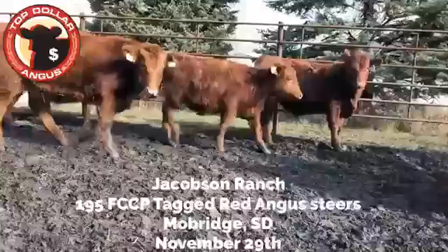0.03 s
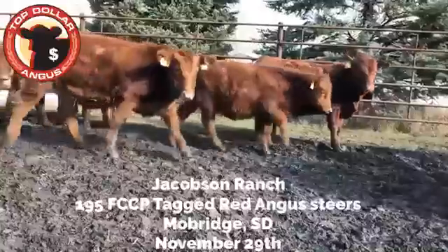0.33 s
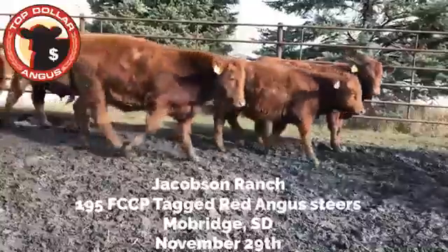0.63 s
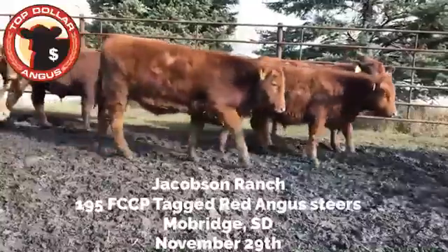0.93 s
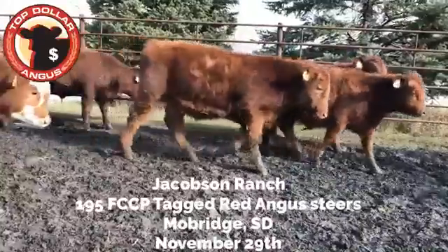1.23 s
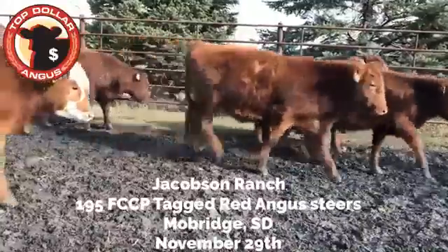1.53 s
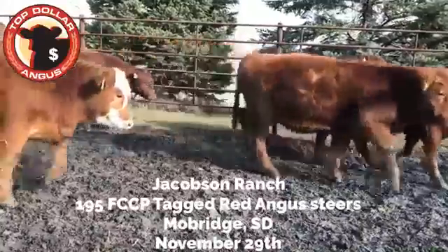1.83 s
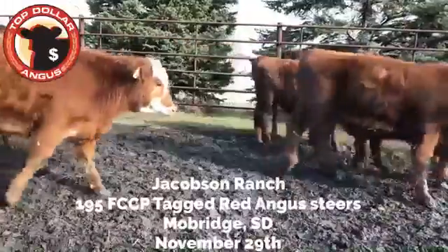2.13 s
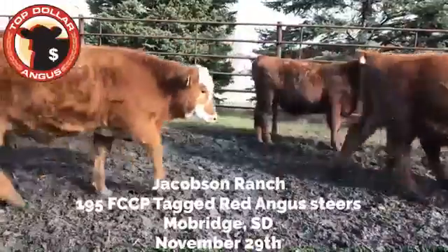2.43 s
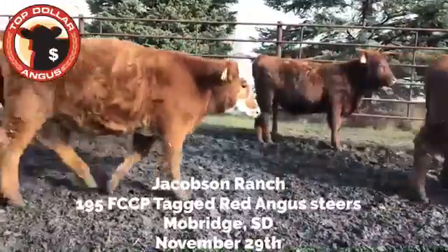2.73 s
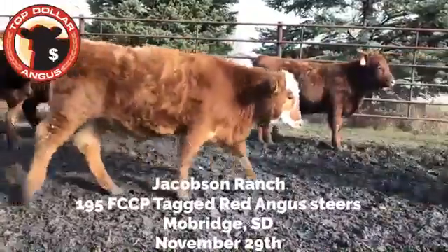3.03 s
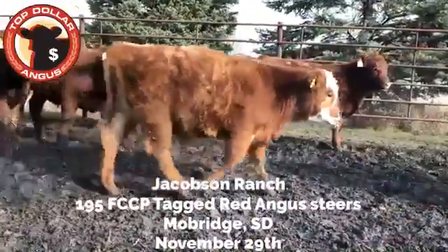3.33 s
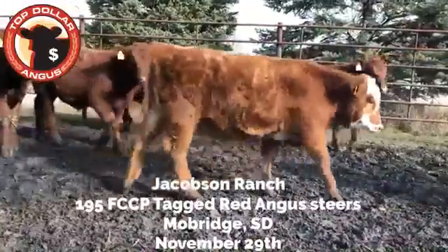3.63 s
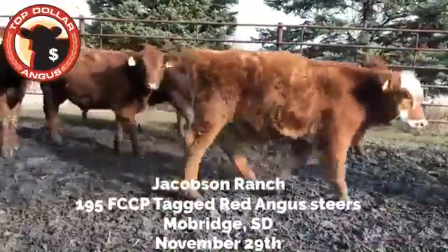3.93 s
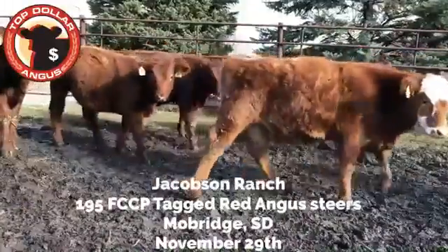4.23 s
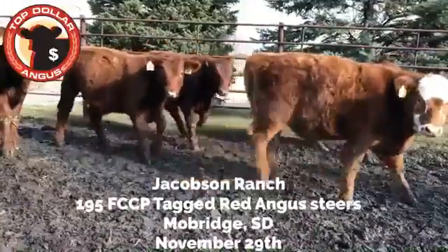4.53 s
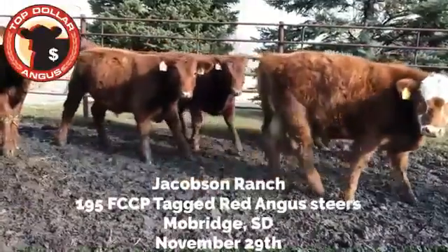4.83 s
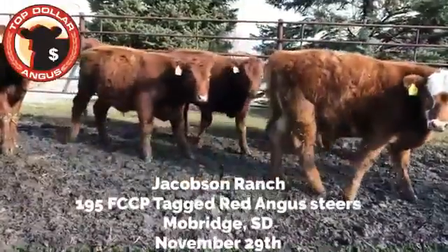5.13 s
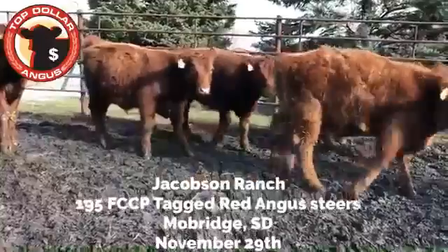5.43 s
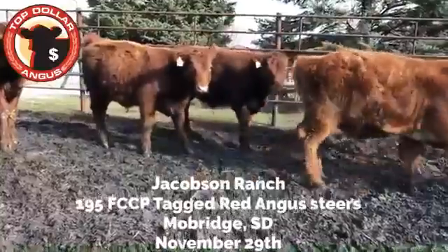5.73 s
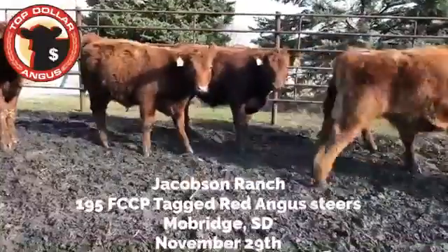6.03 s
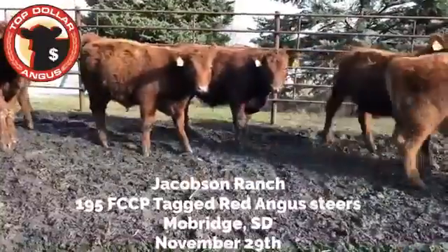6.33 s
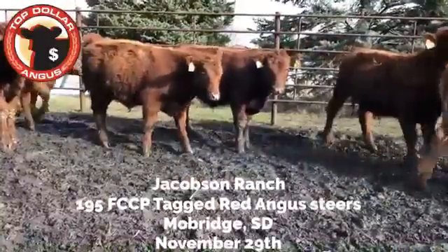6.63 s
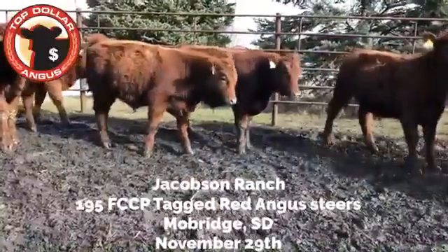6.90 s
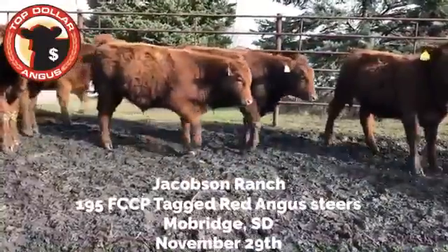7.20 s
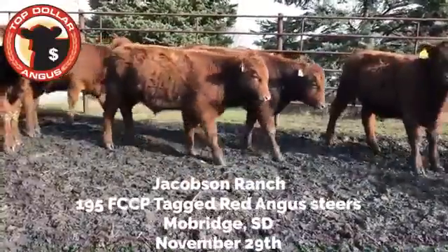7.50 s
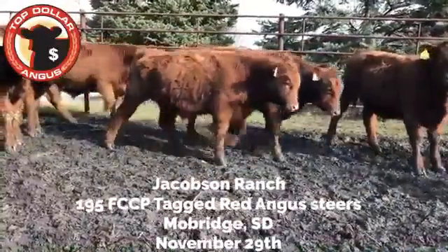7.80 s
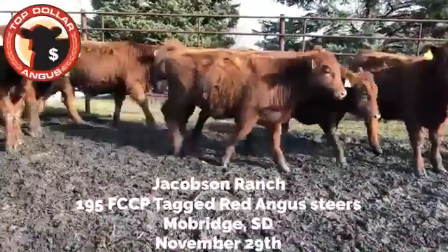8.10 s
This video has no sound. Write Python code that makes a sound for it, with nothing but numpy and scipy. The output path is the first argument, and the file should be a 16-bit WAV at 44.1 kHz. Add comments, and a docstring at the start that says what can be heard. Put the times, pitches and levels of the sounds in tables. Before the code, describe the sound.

Cattle step through crumbly mud outdoors as gusty wind starts thumping the microphone; a small bird chirps faintly and a far steer lows.

```python
"""Steers walk through a pen of half-dried mud: from the start, crumbs rustle, clods crunch under
their hooves and wet pockets pop. Just after two seconds a small bird gives the first of four arched chirps.
From three seconds on, the wind picks up and buffets the microphone in eddies that each fall in pitch.
Around five seconds a far steer lows softly; the bird chirps on, and hooves and wind last to the end."""
import sys
import numpy as np
from scipy import signal
from scipy.fft import rfft, irfft, next_fast_len
from scipy.io import wavfile
from scipy.ndimage import map_coordinates

SR = 44100
rng = np.random.default_rng(int(sys.argv[2]) if len(sys.argv) > 2 else 0)


def store_pcm(level_fs):
    """Save levels as 16-bit WAV."""
    pcm = np.round(np.clip(level_fs, -1, 1) * 32767).astype(np.int16)
    wavfile.write(sys.argv[1], SR, np.atleast_2d(pcm).T)


N = 359856


def amp(db):
    """Decibels to gain."""
    return 10 ** (np.asarray(db) / 20)


def unit(x):
    """Scale to rms 1."""
    return x / np.sqrt(np.mean(x ** 2) + 1e-20)


def curves(rows):
    """Automation lanes: one value per sample for each column after the time."""
    times, *columns = np.transpose(rows)
    return [np.interp(np.arange(N) / SR, times, column) for column in columns]


def hold(s, length, attack, release):
    """An envelope that rises to 1 at time s, holds and dies away; its edges are time constants."""
    t = np.arange(N) / SR
    return np.exp(np.minimum(t - s, 0) / attack - np.maximum(t - s - length, 0) / release)


def wobble(rate):
    """A smooth random curve, rate knots a second."""
    knots = rng.standard_normal(int(N * rate / SR) + 4)
    return map_coordinates(knots, [np.arange(N) * rate / SR])


def filtered(x, response):
    """Shape x with a gain that depends on frequency."""
    size = next_fast_len(len(x) + 8192)
    return irfft(rfft(x, size) * response(np.fft.rfftfreq(size, 1 / SR)), size)[:len(x)]


def coloured(x, points):
    """x through an EQ curve, at rms 1."""
    bands, db = np.transpose(points)
    return unit(filtered(x, lambda hz: amp(np.interp(np.log(hz + 1), np.log(bands), db))))


def add(track, s, sound):
    """Mix a sound into a track at time s."""
    start = max(0, round(s * SR))
    part = track[start:start + len(sound)]
    part += sound[:len(part)]


def grains(size, rate, spread_db):
    """Random tiny fractures: sparse impulses, a few much larger than the rest."""
    sizes = amp(spread_db * np.minimum(rng.standard_normal(size), 2.5))
    return (rng.random(size) < rate / SR) * sizes * rng.standard_normal(size)


def voice(hz, waver, rate):
    """Phase of a slightly unsteady voice that follows a pitch."""
    return 2 * np.pi * np.cumsum(hz * (1 + waver * wobble(rate))) / SR


# EQ of the yard's ambience (frequency [Hz], gain [dB])
AIR_EQ = [(30, -14), (130, 13), (300, -2), (700, -7.5), (1500, -13), (4000, -48.5), (8000, -48),
          (15000, -43)]
def yard_air(level_db=-60):
    """The quiet air of the yard: a steady, dark noise bed."""
    return amp(level_db) * coloured(rng.standard_normal(N), AIR_EQ)


# contour of the far steer's call (time [s], pitch [Hz], relative level [dB])
LOW_CONTOUR = [(4.72, 253.4, -70), (4.78, 258.5, -32), (4.88, 271, -32), (4.97, 260.5, -31.5),
               (5.06, 273.6, -37), (5.17, 286.3, -31), (5.32, 268.2, -28.5), (5.42, 247, -54)]
def lowing(level_db=2, overtone_db=-29):
    """A closed-mouth low: almost a pure tone."""
    t, (hz, db) = np.arange(N) / SR, curves(LOW_CONTOUR)
    phase = voice(hz, waver=0.0037, rate=40)
    gain = amp(db + level_db) * (t > LOW_CONTOUR[0][0]) * (t < LOW_CONTOUR[-1][0])
    return gain * (np.sin(phase) + amp(overtone_db) * np.sin(2 * phase))


# bird calls, each an arch in pitch (time of top [s], top pitch [Hz], rise [s], fall [s], level [dB])
CHIRPS = [(2.205, 4620, 0.036, 0.066, -55), (4.802, 4700, 0.033, 0.054, -50.5),
          (5.946, 4110, 0.083, 0.049, -51), (6.256, 4450, 0.046, 0.057, -45)]
def bird(drop=0.36, rasp_db=4, bounce_db=-6, bounce_s=0.012, echo_db=-8, echo_t60=0.2, fade_s=0.003):
    """Arched, slightly raspy whistles, doubled by the fence and scattered by the trees."""
    out, t = np.zeros(N), np.arange(N) / SR
    for s, top_hz, rise, fall, db in CHIRPS:
        flank = np.minimum(np.maximum((s - t) / rise, (t - s) / fall), 1)
        arch = 1 - drop * flank ** 1.4  # power 1 = pointed top, 2 = round
        gain = amp(db) * np.clip(np.minimum(t - s + rise, s + fall - t) / fade_s, 0, 1)
        out += gain * np.sin(voice(top_hz * arch, waver=0.0213, rate=540))
    out *= amp(rasp_db * wobble(150))
    tail = rng.standard_normal(SR // 3) * amp(-60 * np.arange(SR // 3) / SR / echo_t60)
    scattered = signal.fftconvolve(out, tail / np.linalg.norm(tail))[:N]
    return out + amp(bounce_db) * np.roll(out, int(bounce_s * SR)) + amp(echo_db) * scattered


# gusts riding on the breeze (time [s], length [s], relative push [dB], relative flutter [dB])
GUSTS = [(0.174, 0.041, -42.5, -44.5), (1.466, 0.067, -43, -47), (1.587, 0.048, -33, -36),
         (1.701, 0.034, -37, -47), (2.251, 0.064, -44.5, -59), (2.631, 0.052, -43.5, -53),
         (2.922, 0.019, -26, -40), (3.05, .04, -42, -30), (3.097, 0.077, -25.5, -34),
         (3.154, 0.125, -28.5, -29), (3.476, 0.089, -20.5, -29.5), (3.679, 0.037, -25, -36),
         (3.873, 0.037, -22, -37.5), (4.146, 0.038, -21, -25), (4.222, 0.045, -25.5, -28),
         (4.321, 0.043, -25.5, -30.5), (4.407, 0.057, -21, -28.5), (4.539, 0.095, -25, -31.5),
         (4.697, 0.031, -20, -26), (5.002, .06, -23, -31), (5.091, 0.097, -21.5, -32),
         (5.215, 0.064, -17, -26), (5.312, 0.053, -24, -31), (5.407, 0.094, -20, -26.5),
         (5.633, .059, -21, -23), (5.726, 0.05, -16.5, -21.5), (5.802, 0.17, -24.5, -28),
         (6.189, 0.022, -27, -34), (6.398, .068, -27.5, -30), (6.505, 0.04, -23, -28),
         (6.674, 0.084, -24, -33), (6.998, 0.063, -21, -30), (7.209, 0.013, -23.5, -37),
         (7.403, 0.063, -20, -24), (7.76, 0.014, -20, -30.5), (7.829, 0.047, -19, -30.5),
         (8.044, 0.065, -20, -30)]
def gusts(attack_s=0.0077, release_s=0.011, level_db=0.5):
    """Two envelopes for the gusts: their low push and their flutter."""
    out = np.zeros((2, N))
    for s, length, push_db, flutter_db in GUSTS:
        out = np.maximum(out, amp([[push_db], [flutter_db]]) * hold(s, length, attack_s, release_s))
    return amp(level_db) * out


# the breeze's push on the microphone between gusts (time [s], level [dB])
BREEZE = [(0.0, -53.5), (0.7, -59.5), (1.05, -54.5), (1.25, -45.5), (1.65, -40.5), (1.82, -49),
          (2.55, -51.5), (3.0, -35.5), (3.35, -29), (3.8, -43), (4.07, -35.5), (4.3, -25), (4.82, -28.5),
          (5.3, -33.5), (5.85, -20.5), (6.15, -30.5), (7.5, -28.5), (8.16, -34.5)]
# EQ of the wind's low end (frequency [Hz], gain [dB])
RUMBLE_EQ = [(20, -26), (35, -10), (60, 4), (100, 1), (170, -4.5), (260, -10.5), (480, -33), (1200, -95)]
def rumble(gust, breeze_top_hz=180, lag_s=0.0054):
    """The slow push of the wind: the dull breeze, and a fuller swell just after each gust."""
    t, air = np.arange(N) / SR, coloured(rng.standard_normal(N), RUMBLE_EQ)
    dull = unit(filtered(air, lambda hz: 1 / np.hypot(1, (hz / breeze_top_hz) ** 2)))
    breeze = amp(curves(BREEZE)[0])
    swell = np.interp(t - lag_s, t, gust)
    return np.maximum(breeze - swell, 0) * dull + swell * air


def eddy(start_hz, turns, end_hz, ragged=0.28):
    """A vortex hits the port and swells, each swing longer than the last. Gives pressure and pitch."""
    t = np.arange(SR // 14) / SR
    hz = start_hz / (1 + t * start_hz / turns)
    cycles = np.cumsum(hz) / SR
    swell = (1 - np.exp(-cycles ** 2)) * np.exp(-(end_hz / hz) ** 2) * (1 - t / t[-1])
    # a knot of strands of unequal size, so no two eddies have the same shape
    strands = np.exp(ragged * (2 * rng.random((3, 1)) - 1))
    wave = swell * np.sin(2 * np.pi * (strands * cycles + rng.random((3, 1)))).sum(axis=0)
    strength = np.sqrt(2 * np.sum(wave ** 2 * hz) / np.sum(swell ** 2 * hz))
    return wave / (strength * swell.max()), hz


def flutter(gust, rate=150, start_hz=440, brighten=0.014, spread_db=6, breeze_db=-18):
    """A stream of small eddies, mostly in the gusts; faster air makes them louder and higher."""
    flow = np.hypot(amp(curves(BREEZE)[0] + breeze_db), gust)
    flow_db = 20 * np.log10(flow)
    pitch_hz = start_hz * np.exp(brighten * (flow_db - flow_db.mean()))
    stream, count = np.zeros(N), int(rate * N / SR)
    onsets = (np.arange(count) + rng.random(count)) / count * N
    for onset, (size, detune) in zip(onsets, 2 * rng.random((count, 2)) - 1):
        hz = pitch_hz[int(onset)] * np.exp(0.35 * detune)
        wave, _ = eddy(hz, turns=2.28, end_hz=hz * 0.35)
        add(stream, onset / SR, amp(spread_db * size) * wave)
    return flow * unit(stream)


def hoot(s=3.115, length_s=0.023, level_db=-19, port_hz=473, width_hz=126):
    """A gust grazes the microphone port and rings its hollow."""
    ring = filtered(rng.standard_normal(N), lambda hz: 1 / (1 + ((hz - port_hz) / width_hz) ** 2))
    return amp(level_db) * hold(s, length_s, attack=0.0081, release=0.0062) * unit(ring)


# strong single eddies (time [s], strike level [dB], swollen level [dB])
EDDIES = [(3.097, -15.5, -45), (3.116, -16.5, -38), (3.129, -15.5, -30), (3.278, -21.5, -17),
          (3.512, -12, -13.5), (3.541, -18.5, -13.5), (3.888, -23, -18.5), (4.153, -16, -11),
          (4.239, -21.5, -14.5), (4.373, -30.5, -10), (4.452, -17, -11.5), (4.698, -19, -4),
          (5.22, -27, -6), (5.237, -8.5, -7), (5.424, -15, -26), (5.627, -17.5, -16), (5.694, -15, -30),
          (5.74, -12, -5.5), (5.907, -30, -5), (5.956, -11, -38), (6.195, -28.5, -12.5),
          (6.403, -24, -16.5), (6.691, -16, -11.5), (6.925, -20.5, -17.5), (7.402, -17.5, -15),
          (7.431, -15, -10.5), (7.845, -14, -6.5), (8.086, -11, -6.5), (8.113, -17.5, -14)]
def buffets(mid_hz=551, lead_s=0.001287, brighten=0.014, herald_db=-12, herald_s=0.00884):
    """Strong eddies thump on the microphone: a short flap that sinks into a low push."""
    out, usual_db = np.zeros(N), np.median(np.transpose(EDDIES)[1])
    for s, strike_db, swollen_db in EDDIES:
        start_hz = 1.936 * mid_hz * np.exp(brighten * (strike_db - usual_db))  # harder starts higher
        wave, hz = eddy(start_hz, turns=2.245, end_hz=83.0)
        sunk = np.clip(np.log2(mid_hz / hz) / 2, 0, 1)  # 1 once the pitch has fallen into the bass
        add(out, s - lead_s, wave * ((1 - sunk) * amp(strike_db) + sunk * amp(swollen_db)))
        # a smaller eddy runs just ahead of the big one
        herald, _ = eddy(mid_hz * 1.335, turns=3.54, end_hz=231)
        add(out, s - herald_s * (0.5 + rng.random()), amp(strike_db + herald_db) * herald)
    return out


# crumbs and straw stirred by the herd (time [s], relative level [dB])
HERD_MOTION = [(0.0, -57), (0.5, -52.5), (1.1, -58), (1.35, -55.5), (1.52, -58.5), (1.7, -51), (2.2, -56.5),
               (3.2, -53), (3.8, -55), (4.3, -56.5), (5.0, -56.5), (6.0, -58.5), (6.4, -58), (7.0, -60.5),
               (7.35, -54), (7.75, -60.5), (8.16, -60.5)]
# hooves dragging through loose crumbs (time [s], length [s], relative level [dB])
SCUFFS = [(0.01, 0.043, -49.5), (0.331, 0.091, -53.5), (0.786, 0.21, -51), (1.169, 0.06, -53),
          (1.915, 0.089, -61), (2.455, 0.11, -56), (2.675, 0.082, -49.5), (3.142, 0.226, -53),
          (4.095, 0.076, -57.5), (4.283, 0.055, -54), (6.088, .06, -59), (6.329, 0.063, -49.5),
          (6.558, .18, -53.5), (7.514, 0.037, -51.5), (8.11, .05, -51.5)]
def stirring(edge_s=0.005):
    """Envelope of the disturbed ground: the moving herd and single dragging hooves."""
    scuffs = sum(amp(db) * hold(s, length, edge_s, edge_s) for s, length, db in SCUFFS)
    return np.hypot(amp(curves(HERD_MOTION)[0]), scuffs)


def pocket(hz, t60, glide=0.11):
    """An air pocket in wet mud rings briefly, its pitch creeping up as it closes."""
    t = np.arange(int(t60 * SR) + 8) / SR
    cycles = hz * t * (1 + glide * t / t60)
    return np.sin(2 * np.pi * cycles) * (1 - np.exp(-cycles)) * amp(-60 * t / t60)


# EQ of loose crumbs (frequency [Hz], gain [dB])
CRUMB_EQ = [(150, -14), (400, 1), (700, 3), (1200, 2), (2500, -1), (5000, -4.5), (9000, -9), (15000, -14)]
def rustle(crumb_db=3.5, shift_t60=0.053, shift_share=1.7, wet_db=-5, wet_hz=1900, wet_rate=420):
    """Crumbs shift in small clumps and tiny pockets burst under many feet."""
    t = np.arange(SR // 10) / SR
    shifts = np.minimum(np.abs(grains(N, rate=40, spread_db=2)), 2)
    settling = signal.fftconvolve(shifts, amp(-60 * t / shift_t60))[:N]
    clumps = amp(1.5 * wobble(35)) + shift_share * settling
    crumbs = coloured(clumps * grains(N, rate=11000, spread_db=2), CRUMB_EQ)
    wet, count = np.zeros(N), int(wet_rate * N / SR)
    times = rng.random(count) * N / SR
    for s, (detune, size, life) in zip(times, np.clip(rng.standard_normal((count, 3)), -2, 2)):
        hz = wet_hz * np.exp(0.6 * detune)
        cycles = 15 * np.exp(0.35 * life)
        add(wet, s, amp(7.2 * size) * pocket(hz, cycles / hz))
    return stirring() * (amp(crumb_db) * crumbs + amp(wet_db) * unit(wet))


# wet pockets that pop and squelch (time [s], pitch [Hz], relative peak [dB], decay t60 [s])
POPS = [(.566, 1940, -32, 0.01), (0.743, 238, -40, 0.07), (2.046, 2270, -26.5, 0.012),
        (2.314, 2840, -29.5, 0.0057), (2.552, 1050, -25, 0.015), (2.8, 1600, -30.5, 0.016),
        (5.771, 1740, -30, 0.016), (6.148, 8650, -21, 0.0066), (7.594, 1230, -25, 0.024),
        (7.793, 4270, -24.5, 0.0069)]
def pops(level_db=-1, tear=0.9):
    """A hoof opens an air pocket; the tearing mud keeps nudging it."""
    out = np.zeros(N)
    for s, hz, db, t60 in POPS:
        t = np.arange(int(t60 * SR)) / SR
        nudges = tear * grains(len(t), rate=900, spread_db=2) * amp(-30 * t / t60)
        ring = signal.fftconvolve((t == 0) + nudges, pocket(hz, t60))
        add(out, s, amp(db + level_db) * ring / np.abs(ring).max())
    return out


# bright EQ of dry mud snapping (frequency [Hz], gain [dB])
SNAP_EQ = [(300, -23), (1500, -2), (3500, 3), (8000, 0), (15000, -3.5)]
def crackle(rate=45, spread_db=4, level_db=-13):
    """Single dry crumbs snap here and there, louder where the ground is busy."""
    return amp(curves(HERD_MOTION)[0] + level_db) * coloured(grains(N, rate, spread_db), SNAP_EQ)


def uneven(points, depth_db=6.0):
    """The EQ of one clod: its kind's colour with bumps from its own size and shape."""
    hz, db = np.transpose(points)
    grid = np.linspace(np.log(hz[0]), np.log(hz[-1]), 22)
    bumps = depth_db * rng.standard_normal(len(grid))
    return np.column_stack([np.exp(grid), np.interp(grid, np.log(hz), db) + bumps])


# dull EQ of a clod's soft inside (frequency [Hz], gain [dB])
CLOD_EQ = [(120, -13), (450, -2), (1100, 2), (2200, -1.5), (4000, -12.5), (12000, -21)]
# clods breaking under a hoof (time [s], relative crust level [dB], relative body level [dB])
CRUNCHES = [(0.1053, -38, -40.5), (0.3115, -31, -70), (0.4083, -25, -61), (0.5262, -50, -37.5),
            (0.6, -37, -37.5), (0.6412, -33, -42.5), (0.84, -47.5, -41), (0.8838, -29.5, -40),
            (1.274, -23.5, -40.5), (1.35, -32.5, -40), (1.457, -36, -70), (1.674, -27, -47),
            (1.7662, -25.5, -69), (1.8672, -33, -38.5), (1.8997, -37, -38), (2.0441, -21, -46),
            (2.2877, -27, -38), (2.371, -33, -42.5), (2.401, -25.5, -68), (2.5242, -36, -39),
            (2.55, -27.5, -31.5), (2.806, -51, -39), (2.9426, -24.5, -43), (2.989, -29.5, -49),
            (3.1112, -29, -62), (3.356, -21.5, -41), (3.6423, -27.5, -55), (3.717, -27, -44),
            (3.812, -30, -62), (4.1976, -45, -42.5), (4.6136, -34, -48.5), (4.863, -25.5, -37),
            (5.28, -33, -41.5), (5.5141, -37, -39), (5.7686, -68, -40), (6.146, -21.5, -40.5),
            (6.358, -26.5, -39), (6.416, -30.5, -68), (6.4723, -23.5, -35), (6.5962, -31, -42),
            (7.0881, -25.5, -50), (7.592, -23, -52), (7.791, -39, -36), (7.8706, -24, -35),
            (8.0688, -33.5, -57)]
def crunches(yield_s=0.00062, crust_t60=0.025, body_t60=0.076, strain_db=-23, strain_t60=0.057,
             crumble_db=-23, crumble_t60=0.18, crust_trim_db=-25, body_trim_db=-10):
    """A clod strains under the hoof, gives way in a quick burst of fractures, then crumbles."""
    out, t = np.zeros(N), np.arange(-SR // 40, SR // 10) / SR
    after = np.maximum(t, 0)
    strain = amp(strain_db + 60 * np.minimum(t, 0) / strain_t60)
    broken = np.clip(t / yield_s, 0, 1)
    crumble = amp(crumble_db - 60 * after / crumble_t60)
    burst = lambda t60: (1 - broken) * strain + broken * (amp(-60 * after / t60) + crumble)
    for s, crust_db, body_db in CRUNCHES:
        crust = coloured(burst(crust_t60) * grains(len(t), rate=6000, spread_db=-9.5), uneven(SNAP_EQ))
        # the soft inside takes longer to collapse than the dry crust
        body = coloured(burst(body_t60) * grains(len(t), rate=6600, spread_db=-0.5), uneven(CLOD_EQ))
        add(out, s + t[0], amp(crust_db + crust_trim_db) * crust + amp(body_db + body_trim_db) * body)
    return out


def scene():
    """Wind, hooves and animals in one mono mix."""
    push, churn = gusts()
    wind = rumble(push) + flutter(churn) + buffets() + hoot()
    pen = rustle() + yard_air() + crackle() + crunches() + pops()
    return (wind + pen + bird() + lowing())[None]


def record(dry, low_cut_hz=36, top_hz=15300):
    """The camera trims the deepest bass and keeps nothing above its band limit."""
    trimmed = signal.sosfilt(signal.butter(2, low_cut_hz, "high", fs=SR, output="sos"), dry[0])
    return filtered(trimmed, lambda hz: hz < top_hz)[None]


dry = scene()
out = record(dry)
store_pcm(out)
```